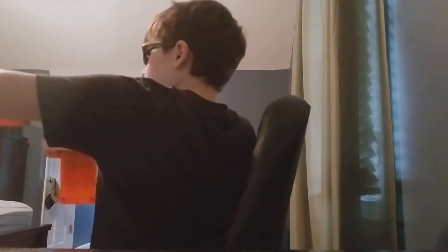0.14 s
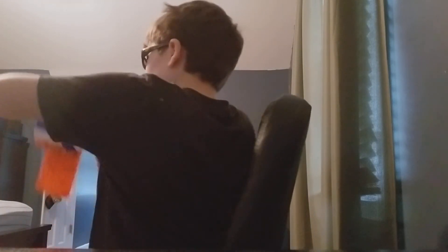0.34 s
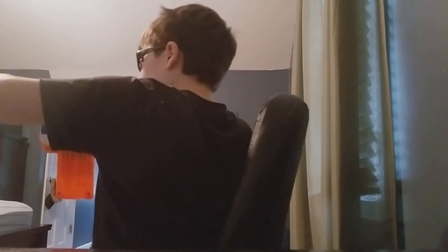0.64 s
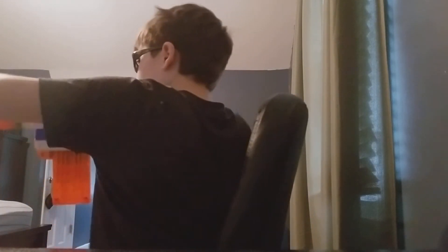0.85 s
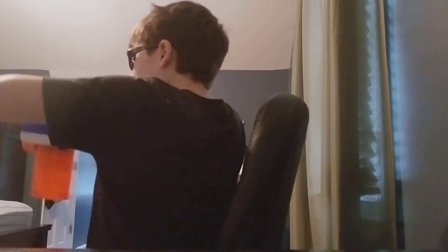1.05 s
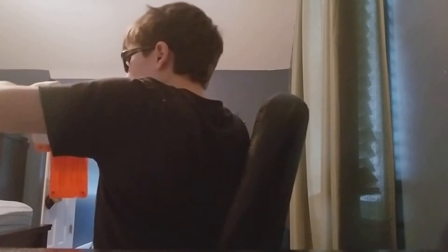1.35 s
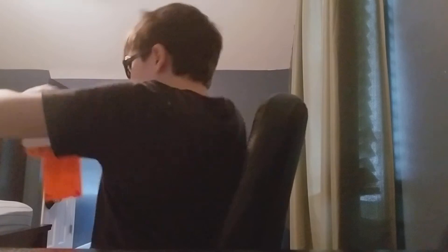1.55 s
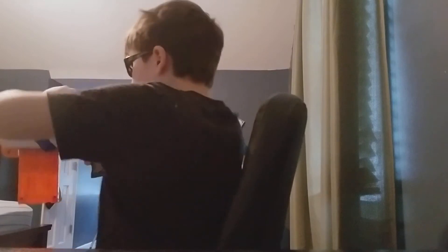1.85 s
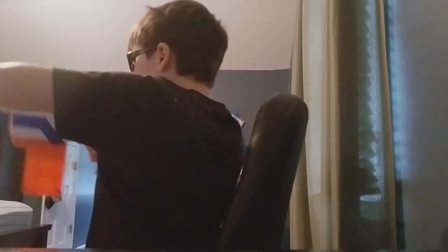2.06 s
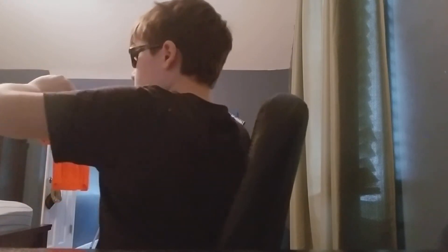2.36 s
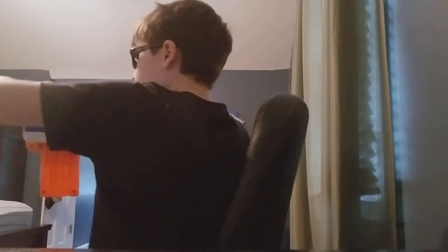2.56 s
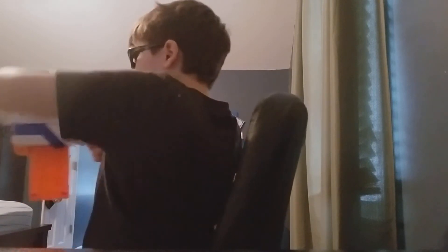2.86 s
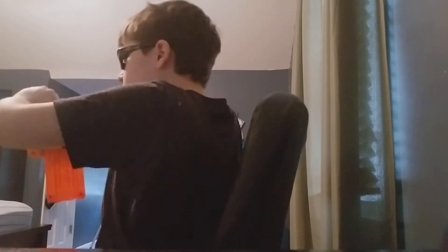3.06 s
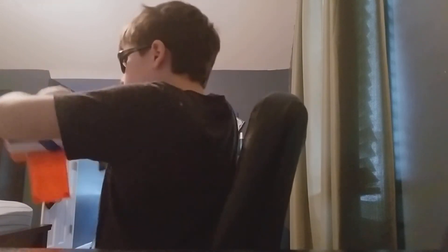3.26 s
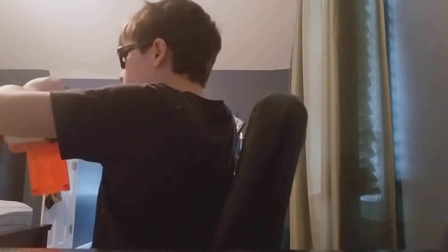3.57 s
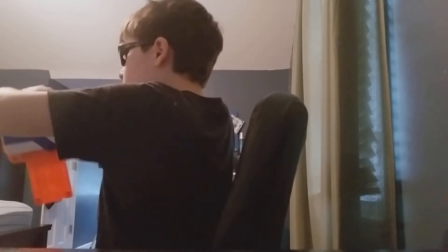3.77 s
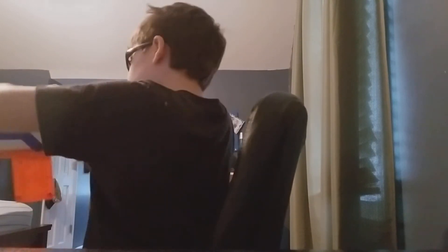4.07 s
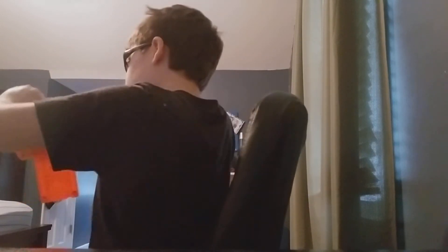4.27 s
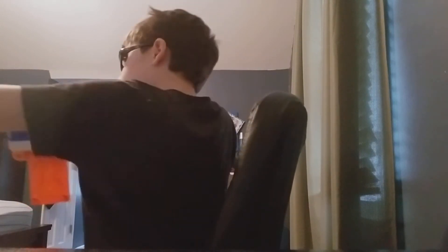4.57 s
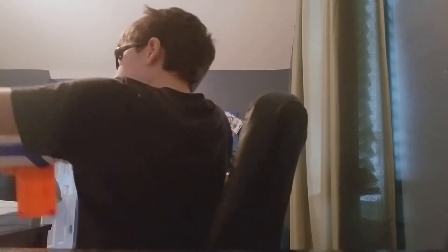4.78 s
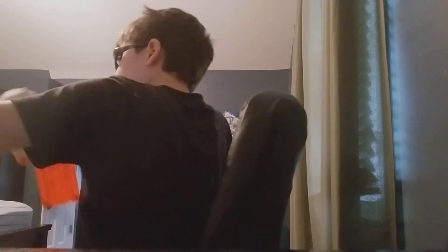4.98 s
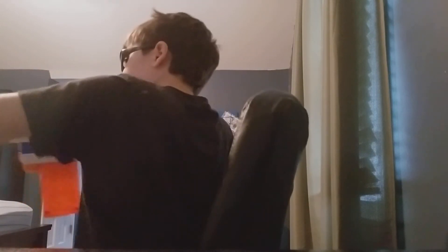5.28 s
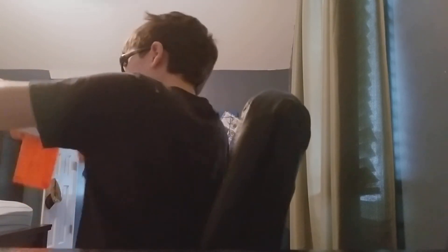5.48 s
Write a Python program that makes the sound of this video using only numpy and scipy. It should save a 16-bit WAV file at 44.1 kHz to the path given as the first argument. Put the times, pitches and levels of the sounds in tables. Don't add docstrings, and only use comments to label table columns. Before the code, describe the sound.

Seven sharp, boomy toy blaster shots in under six seconds, each followed by quick plastic pumping scrapes, knocks and a brief hollow ring.

```python
import sys
import numpy as np
from scipy import signal
from scipy.fft import rfft, irfft
from scipy.io import wavfile
from scipy.ndimage import uniform_filter1d

SR = 44100
rng = np.random.default_rng(int(sys.argv[2]) if len(sys.argv) > 2 else 0)


def master_out(mix):
    frames = np.transpose(np.atleast_2d(mix))
    ceiling = np.clip(frames, -1, 1)
    pcm = np.round(ceiling * 32767).astype(np.int16)
    wavfile.write(sys.argv[1], SR, pcm)


def ratio_of_db(decibels):
    return 10 ** (np.asarray(decibels, float) / 20)


N = 249076
SIZE = 2 ** 18
HZ = np.arange(SIZE // 2 + 1) * SR / SIZE + 0.01


# time in seconds, peak in dB, boom in dB, spring shudder in dB.
SHOTS = [
    (0.057, -2.5, -7.5, -29),
    (0.743, -1.5, -7, -32),
    (1.441, 0.5, -10.5, -50),
    (2.442, -0.5, -9.5, -35),
    (3.136, 0, -7.5, -19),
    (4.451, 1, -8.5, -35),
    (5.156, 0.5, -7, -35),
]
# frequency in Hz, level in dB per Hz.
SHOT_COLOUR = [(18, -25.5), (30, -19), (128, -7), (229, -9.5), (268, -10.5), (467, -0.5), (533, -5.5),
               (792, -6.5), (1030, -5), (7280, -40), (10500, -27), (15200, -36), (16500, -36.5)]


def shots():
    boom, body, treble = blows(SHOTS, boom_db=10.0, treble_db=-2.0, lead_ms=4.4, rattle_ms=3.43,
                               rough_db=5.5, rumble=0.41, reach=1.5)
    thump_delay_s, thump_db = 0.028, -3.0
    boom = boom * (1 + ratio_of_db(thump_db) * np.exp(-2j * np.pi * HZ * thump_delay_s))
    return ratio_of_db(15.5) * join_ranges(boom, body, treble) * shell(SHOT_COLOUR)


# time in seconds, peak in dB, boom in dB, hollow ring in dB.
FRONT_STOPS = [
    (0.533, -14.5, -47, -23),
    (1.18, -11, -43, -13),
    (2.174, -13, -36, -12.5),
    (2.879, -9, -35, -25.5),
    (4.176, -8.5, -35, -18.5),
    (4.918, -9, -28, -26),
    (5.602, -9.5, -35, -15),
]


def front_stops():
    return blows(FRONT_STOPS, boom_db=21.5, treble_db=3.0, lead_ms=18.1, rattle_ms=1.42,
                 rough_db=4.5, rumble=0.13, reach=1.7)


def hollow():
    rebound_s, rebound_db = 0.038, -10
    rows = []
    for s, *_, db in FRONT_STOPS:
        rows += [(s, db, 0), (s + rebound_s, db + rebound_db, 0)]
    force = blows(rows, boom_db=0, treble_db=0, lead_ms=7, rattle_ms=2.45,
                  rough_db=5.5, rumble=0.31, reach=2.2)[1]
    ring_hz, width_hz = 522.4, 127
    detuning = (HZ / ring_hz - ring_hz / HZ) * ring_hz / width_hz
    return ratio_of_db(17.5) * force * unit(1 / (1 + 1j * detuning) ** 2)


# time in seconds, peak in dB, boom in dB.
REAR_STOPS = [
    (0.272, -16.5, -46),
    (0.894, -12.5, -15),
    (2.599, -11.5, -15),
    (3.889, -20.5, -37),
    (4.691, -14.5, -54),
    (5.357, -15.5, -19),
]


def rear_stops():
    return blows(REAR_STOPS, boom_db=23.5, treble_db=3.5, lead_ms=22, rattle_ms=2.97,
                 rough_db=5.0, rumble=0.23, reach=2.1)


# time in seconds, peak in dB, boom in dB.
JERKS = [(0.199, -13.5, -27), (0.21, -4.5, -28), (0.428, -15.5, -49), (0.864, -15, -26.5), (1.08, -13, -33),
         (2.073, -14, -28.5), (2.564, -13.5, -26), (2.796, -14, -30.5), (3.819, -24, -45),
         (3.874, -11.5, -45), (4.097, -13, -50), (4.589, -10.5, -14), (4.847, -12, -34), (5.294, -3.5, -18),
         (5.513, -15, -35)]


def jerks():
    return blows(JERKS, boom_db=25, treble_db=-0.6, lead_ms=4.5, rattle_ms=8.8,
                 rough_db=2.5, rumble=0.42, reach=4.0)


# time in seconds, peak in dB, boom in dB.
CLACKS = [(0.249, -11.5, -16), (0.513, -15.5, -37), (0.939, -9, -33), (1.564, -33, -20), (1.588, -5, -16.5),
          (1.631, -13.5, -21), (3.282, -9, -13), (3.776, -55, -2), (4.208, -14.5, -23), (4.64, -8, -25),
          (5.536, -41, -16)]


def clacks():
    return blows(CLACKS, boom_db=28, treble_db=3.5, lead_ms=1.7, rattle_ms=1.96,
                 rough_db=5.0, rumble=0.45, reach=1.7)


# time in seconds, peak in dB, boom in dB.
THUDS = [
    (0.916, -21.5, 0),
    (1.609, -28.5, 8.5),
    (2.235, -38.5, 1),
    (2.619, -24, 2.5),
    (3.305, -9.5, -16.5),
]


def thuds():
    return blows(THUDS, boom_db=31, treble_db=-29.0, lead_ms=16.0, rattle_ms=2.3,
                 rough_db=0.5, rumble=0.23, reach=3.6)


# frequency in Hz, level in dB per Hz.
SLIDE_COLOUR = [(18, -64), (30, -30), (171, -15), (255, -13.5), (533, -4), (690, -8), (1060, -3.5),
                (1180, -10), (1450, -6.5), (2340, -15.5), (7670, -36.5), (9600, -24.5), (12300, -26),
                (16500, -38.5)]
# frequency in Hz, width in Hz, level in dB.
CAVITY = [(410, 74, 4), (511, 31, -1.5), (553, 15, 6), (576, 61, 1.5)]


def slide_body():
    return shell(SLIDE_COLOUR, CAVITY)


# time in seconds, peak in dB,
# boom in dB.
TICKS = [(0.014, -27, -2), (0.676, -26.5, -39), (1.373, -21.5, -1), (1.784, -36, 7), (1.833, -55, -2),
         (2.021, -26.5, -9), (2.391, -17.5, -25), (3.062, -14.5, -30), (3.287, -2.5, -29),
         (3.449, -13, -25), (4.386, -18.5, -35), (5.087, -30, -21)]


def ticks():
    return blows(TICKS, boom_db=6.5, treble_db=0.0, lead_ms=0.58, rattle_ms=1.2,
                 rough_db=3.5, rumble=0.85, reach=1.8)


# time in seconds, peak in dB, boom in dB.
LATCH = [
    (0.7, -28, -0.5),
    (1.158, -22, -18),
    (1.396, -25.5, -6),
    (1.893, -14, -13.5),
    (2.158, -26, -17),
    (2.695, -13, -6.5),
    (4.409, -25.5, -20),
    (5.121, -25.5, -13),
]


def latch():
    return blows(LATCH, boom_db=14.5, treble_db=15.0, lead_ms=0.29, rattle_ms=4.4,
                 rough_db=4.5, rumble=0.74, reach=1.9)


# frequency in Hz, level in dB per Hz.
TICK_COLOUR = [(35, -63.5), (60, -16.5), (276, -11.5), (546, -5), (916, -3.5), (1060, 0), (6760, -42),
               (10600, -32), (15400, -42.5), (16500, -82.5)]


def knocks():
    big = ratio_of_db(12.5) * (jerks() + clacks() + thuds()) + ratio_of_db(21) * (rear_stops() + front_stops())
    small = ratio_of_db(10.5) * join_ranges(*(ticks() + latch()))
    return join_ranges(*big) * slide_body() + small * shell(TICK_COLOUR) + bumps()


# time in seconds, peak in dB, boom in dB.
BUMPS = [
    (3.09, -24, 1),
    (3.36, -21, 3),
    (3.399, -27.5, 9.5),
    (3.55, -24.5, -3),
]
# frequency in Hz, level in dB per Hz.
BUMP_COLOUR = [(35, -39.5), (60, -14), (290, -9), (403, -21), (475, -9), (675, -31), (10300, -74),
               (16500, -68)]


def bumps():
    force = ratio_of_db(12.0) * blows(BUMPS, boom_db=-6.5, treble_db=-9.0, lead_ms=2.9, rattle_ms=4.1,
                              rough_db=-4.5, rumble=0.6, reach=3.6)
    return join_ranges(*force) * unit(causal(along(BUMP_COLOUR, HZ)))


# start in seconds, hardest moment in seconds, end in seconds, level in dB.
PULLS = [
    (0.207, 0.312, 0.4, -32.5),
    (0.857, 0.94, 1.02, -26),
    (1.512, 1.558, 1.74, -21.5),
    (2.542, 2.58, 2.88, -24),
    (3.3, 3.333, 3.6, -36),
    (4.571, 4.636, 5.14, -21.5),
    (5.262, 5.3, 5.63, -22),
]


def pulls():
    return sum(stroke(*row, rise=118.5, fade=129, treble_db=-4.5) for row in PULLS)


# start in seconds, end in seconds, level in dB.
PUSHES = [
    (0.441, 0.735, -29),
    (1.097, 1.31, -29),
    (2.095, 2.293, -28),
    (2.794, 2.995, -25.5),
    (4.107, 4.3, -28),
    (4.844, 5.138, -29.5),
    (5.501, 5.65, -22.5),
]


def pushes():
    return sum(stroke(s, s, end, db, rise=0, fade=75, treble_db=-3) for s, end, db in PUSHES)


# start in seconds, end in seconds, level in dB.
GRIPS = [
    (0.0, 0.061, -41.5),
    (1.745, 2.073, -45.5),
    (2.39, 2.437, -61),
    (3.073, 3.112, -34.5),
    (3.47, 3.66, -62.5),
    (3.754, 3.83, -52.5),
    (3.818, 4.075, -41),
    (4.3, 4.44, -56),
    (1.3, 1.43, -59),
    (2.3, 2.39, -60),
]


def grips():
    return sum(stroke(s, s, end, db, rise=0, fade=-4, treble_db=-7.5) for s, end, db in GRIPS)


def shudder():
    return sum(stroke(s, s, s + 0.1, db, rise=0, fade=107, treble_db=3.5) for s, *_, db in SHOTS)


def scrape():
    slips_per_s = 900
    happens = rng.random(N) < slips_per_s / SR
    slips = happens * rng.standard_normal(N) * ratio_of_db(5.5 * rng.standard_normal(N))
    press = pulls() + pushes() + grips() + shudder()
    body, treble = rfft(slips / np.std(slips) * press, SIZE)
    return ratio_of_db(-6.5) * join_ranges(ratio_of_db(2.0) * body, body, treble) * slide_body()


# frequency in Hz, time in seconds.
ROOM_T60 = [(60, 0.042), (250, 0.23), (1000, 0.14), (4000, 0.16), (12000, 0.13)]
# frequency in Hz, correlation from 0 to 1.
LIKENESS = [(60, 1), (150, 0.97), (400, 0.97), (1000, 0.069), (2500, 0.29)]


def room(wet_db, build_s, size):
    t = np.arange(SR // 2) / SR
    echoes = 0
    for hz in 40 * 2 ** np.arange(0, 9, 0.5):
        band = np.cos(np.pi * np.clip(np.log2(HZ / hz), -0.5, 0.5))
        decay = (1 - np.exp(-t / build_s)) * ratio_of_db(-60 * t / along(ROOM_T60, hz))
        mid, side = rfft(rng.standard_normal((2, len(t))) * decay, SIZE) * band
        like = np.clip(along(LIKENESS, hz), 0, 1)
        mid = mid * np.sqrt((1 + like) / 2)
        side = side * np.sqrt((1 - like) / 2)
        echoes = echoes + np.array([mid + side, mid - side])
    echoes = rfft(irfft(echoes)[:, :SR], SIZE)
    left = ratio_of_db(5.0) * np.exp(-2j * np.pi * HZ * 6.32 / SR)
    direct = np.array([left, np.ones_like(left)])
    both = direct + ratio_of_db(wet_db) * even(echoes, size=241)
    return even(both, size=size) * ratio_of_db(np.array([[4.2], [3.1]]))


# frequency in Hz, level in dB per Hz.
QUIET = [(18, -54), (30, 0), (142, -7), (230, -13.5), (420, -18.5), (547, -11), (800, -21.5), (13000, -78),
         (16500, -52)]


def quiet():
    noise = rfft(rng.standard_normal((2, N)), SIZE) * unit(causal(along(QUIET, HZ)))
    mid, side = irfft(noise)[:, :N]
    room_noise = ratio_of_db(-63 + 4.0) * np.array([mid + 0.21 * side, mid - 0.28 * side])
    return room_noise + ratio_of_db(-75.5) * rng.standard_normal((2, N))


def blows(table, boom_db, treble_db, lead_ms, rattle_ms, rough_db, rumble, reach):
    before = 4096
    force = np.zeros((3, N + SR))
    t = np.arange(-before, before) / SR * 1000
    chance = rng.standard_normal((len(table), 2, len(t)))
    run_up = rumble * np.exp(t / max(lead_ms, 0.1)) * (t > -reach * lead_ms)
    shape = np.where(t < 0, run_up, np.exp(-t / max(rattle_ms, 0.3)))
    for (s, db, low_db, *_), (sign, size) in zip(table, chance):
        contacts = shape * sign * ratio_of_db(rough_db * size)
        burst = ratio_of_db(db) * irfft(even(rfft(contacts), size=15))
        gains = ratio_of_db(np.array([[low_db + boom_db], [0], [treble_db]]))
        start = int(s * SR)
        force[:, start:start + len(t)] += gains * burst
    return rfft(force[:, before:], SIZE)


def stroke(start, hardest, end, db, rise, fade, treble_db):
    t = np.arange(N) / SR
    lost_db = np.clip(np.maximum(rise * (hardest - t), fade * (t - hardest)), -40, 60)
    edges = np.clip(np.minimum(t - start, end - t) / 0.0062, 0, 1)
    press = ratio_of_db(db - lost_db) * edges
    thinning = 0.18
    return np.array([press, press * ratio_of_db(treble_db + thinning * lost_db)])


# frequency in
# Hz, width in Hz, level in dB.
SHELL = [(165, 17, 6), (202, 26, 3), (343, 62, -2.5), (388.7, 8, 3), (439, 35, 2), (522, 36, 6.5),
         (559.7, 26, 7.5), (1020, 46, -3), (1336, 118, 6.5), (1360, 60, -9), (1820, 64, 1.5),
         (2520, 660, 4), (4300, 1230, 5), (10500, 2300, -2)]


def shell(colour, extra=()):
    peaks = 0
    for hz, width, db in [*SHELL, *extra]:
        peaks = peaks + ratio_of_db(db) ** 2 / (1 + ((HZ - hz) * 2 / width) ** 2)
    return unit(causal(along(colour, HZ) + 10 * np.log10(1 + peaks)))


def join_ranges(boom, body, treble):
    s, u = 1j * HZ / 280, 1j * HZ / 3000
    low = (1 + np.sqrt(2) * s + s ** 2) ** 2
    top = (1 + np.sqrt(2) * u + u ** 2) ** 2
    return (boom + s ** 4 * (body + treble * u ** 4) / top) / low


def along(table, hz):
    f, v = np.transpose(table)
    return np.interp(np.log(hz), np.log(f), v)


def causal(db):
    cepstrum = irfft(db * np.log(10) / 20)
    half = cepstrum.shape[-1] // 2
    cepstrum[..., 1:half] *= 2
    cepstrum[..., half + 1:] = 0
    return np.exp(rfft(cepstrum))


def even(spectrum, size):
    power = uniform_filter1d(np.abs(spectrum) ** 2, size=size)
    return spectrum * causal(-10 * np.log10(power + np.mean(power) / 1000))


def unit(response):
    return response / np.sqrt(np.mean(np.abs(response) ** 2))


def scene():
    firing = shots() * room(wet_db=6.0, build_s=0.0033, size=301)
    pumping = (knocks() + scrape() + hollow()) * room(wet_db=10.0, build_s=0.0018, size=121)
    return irfft(firing + pumping)[:, :N] + quiet()


def top_cut(x):
    return signal.sosfilt(signal.butter(12, 16850, fs=SR, output="sos"), x)


def record(dry):
    bass = signal.butter(2, 45, "highpass", fs=SR, output="sos")
    top = signal.ellip(8, 0.2, 50, 16000, fs=SR, output="sos")
    rounded = 0.95 * np.tanh(signal.sosfilt(bass, dry) / 0.95)
    return top_cut(signal.sosfilt(top, rounded))


dry = scene()
out = record(dry)
master_out(out)
```